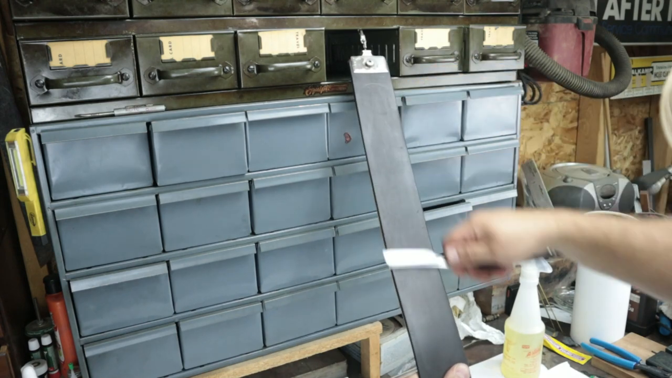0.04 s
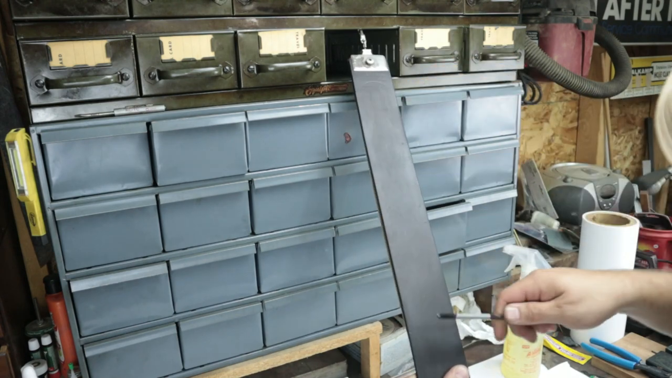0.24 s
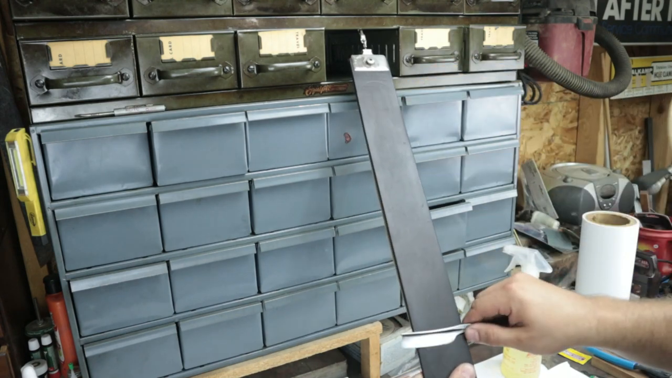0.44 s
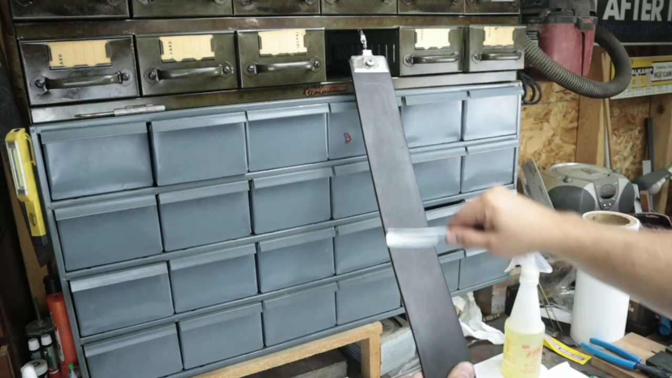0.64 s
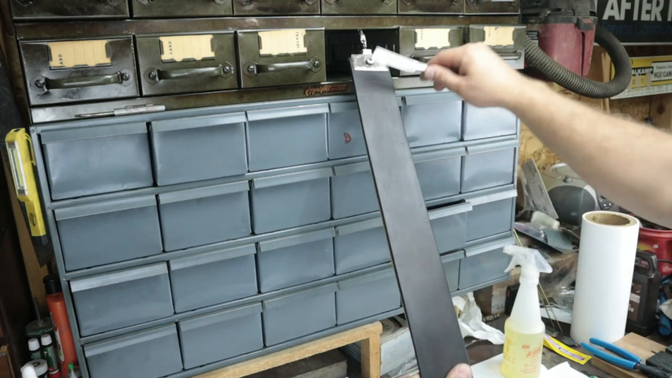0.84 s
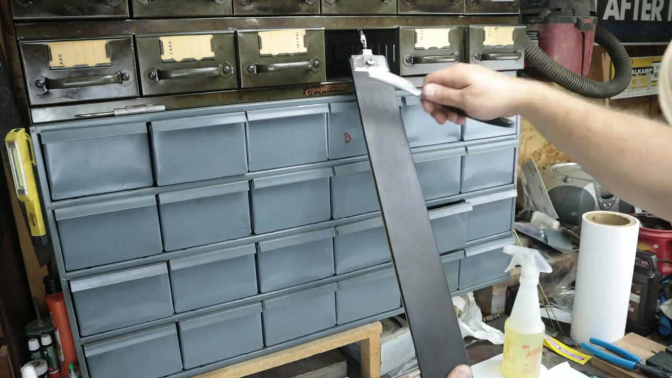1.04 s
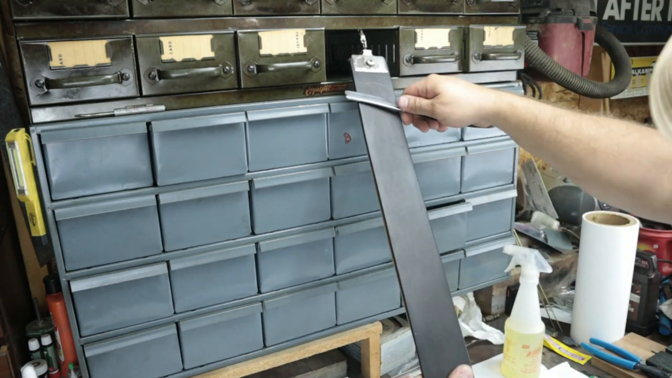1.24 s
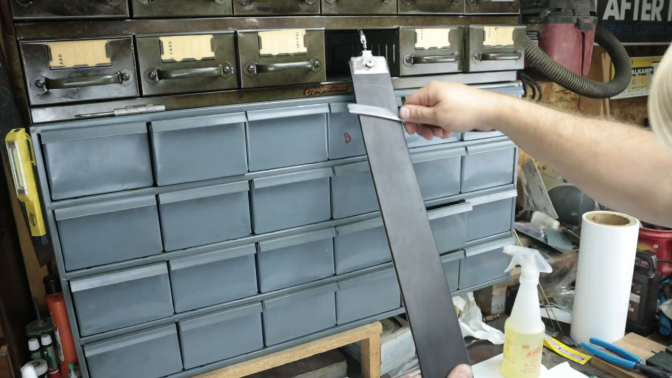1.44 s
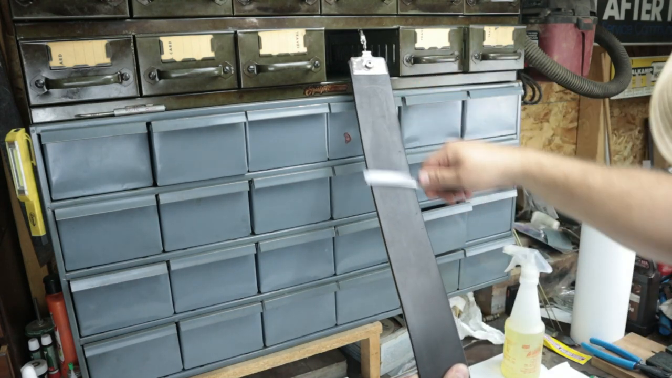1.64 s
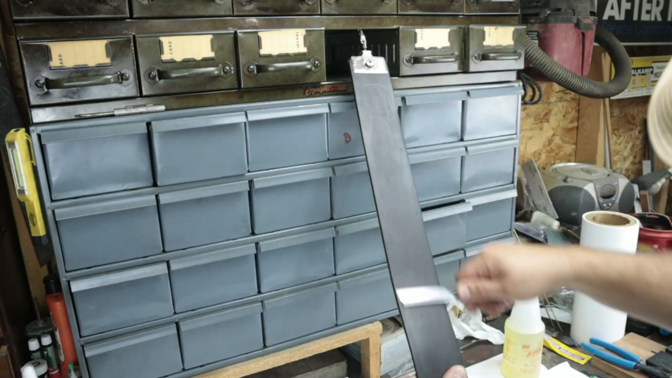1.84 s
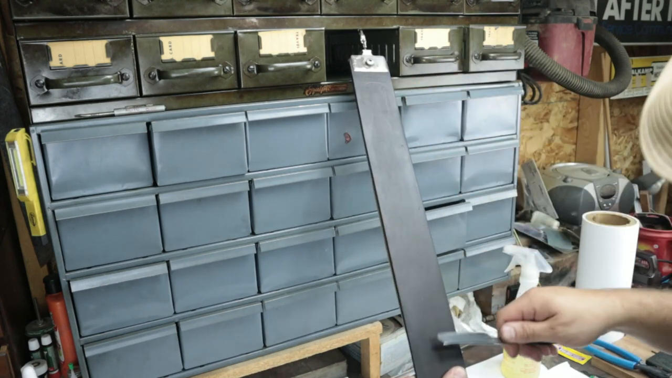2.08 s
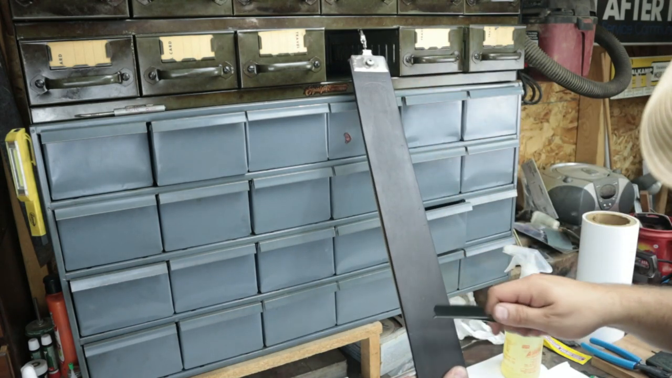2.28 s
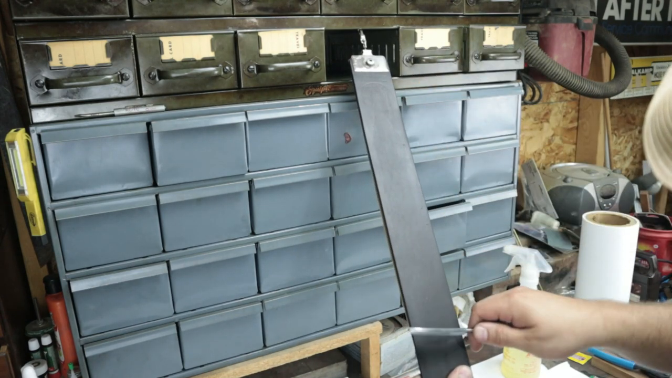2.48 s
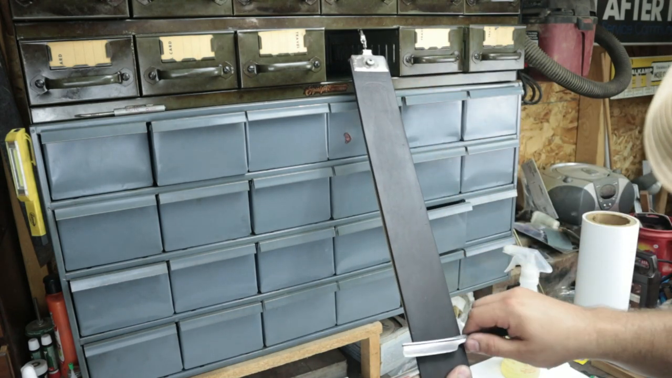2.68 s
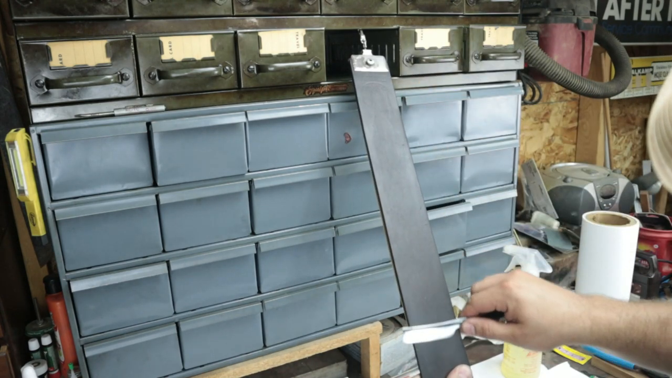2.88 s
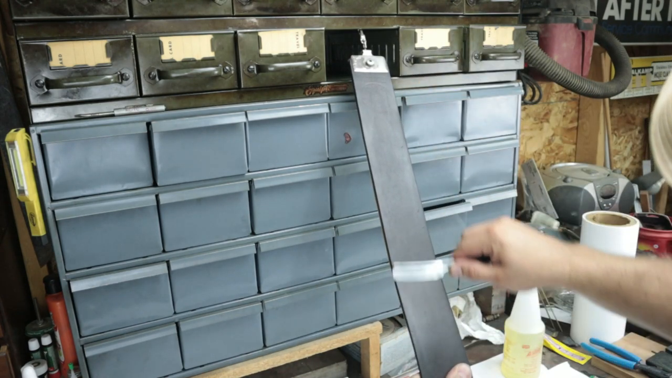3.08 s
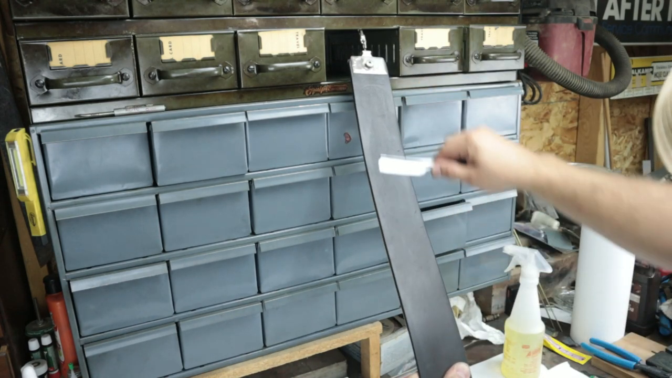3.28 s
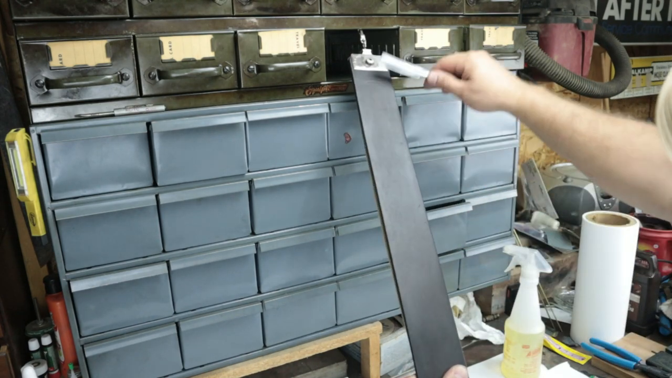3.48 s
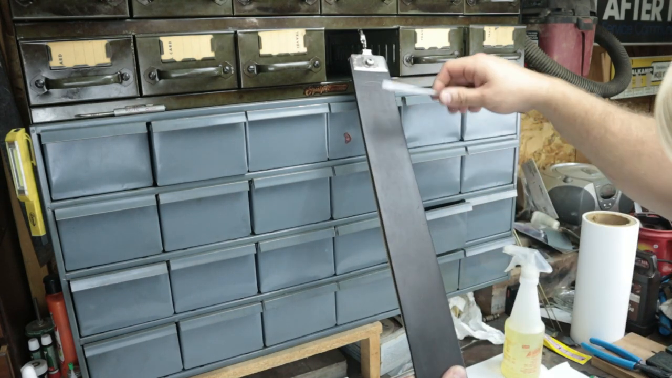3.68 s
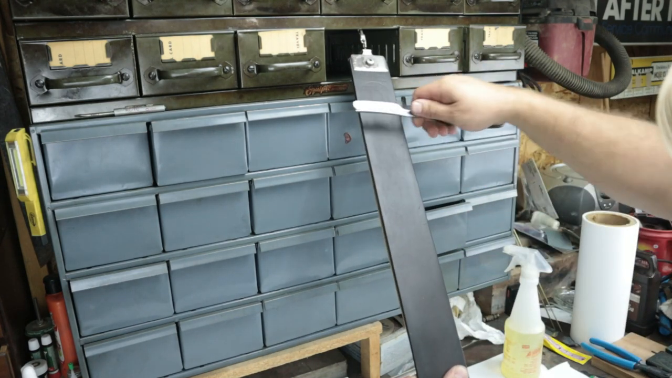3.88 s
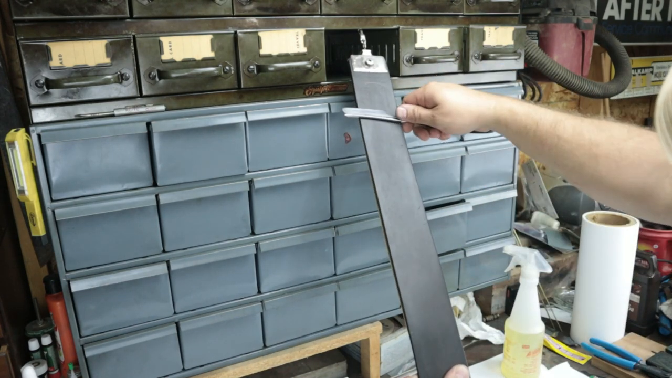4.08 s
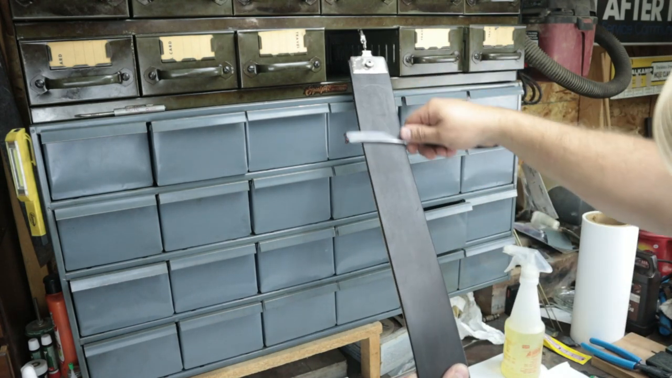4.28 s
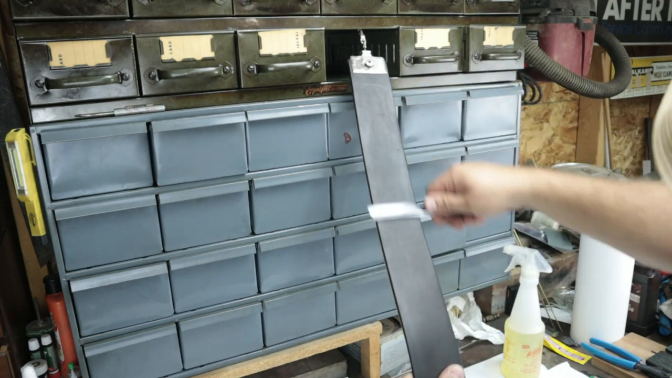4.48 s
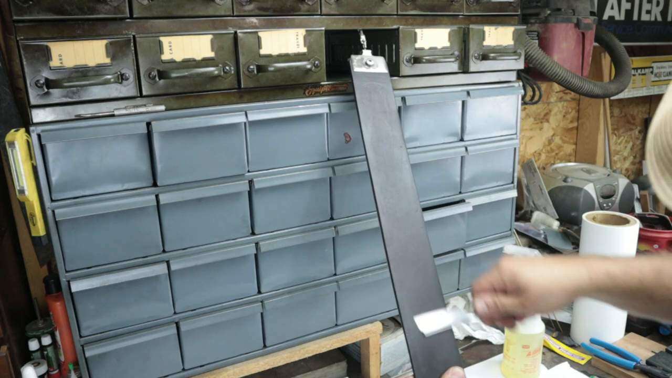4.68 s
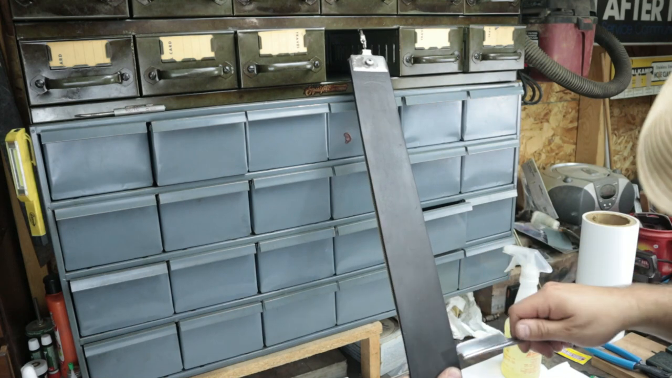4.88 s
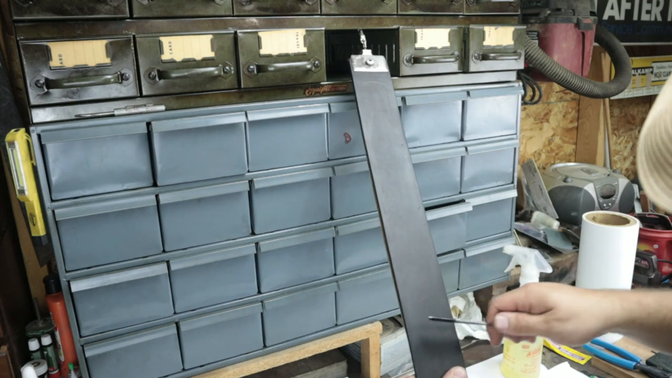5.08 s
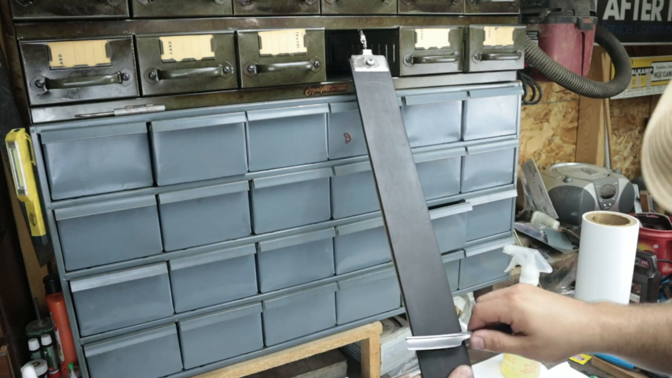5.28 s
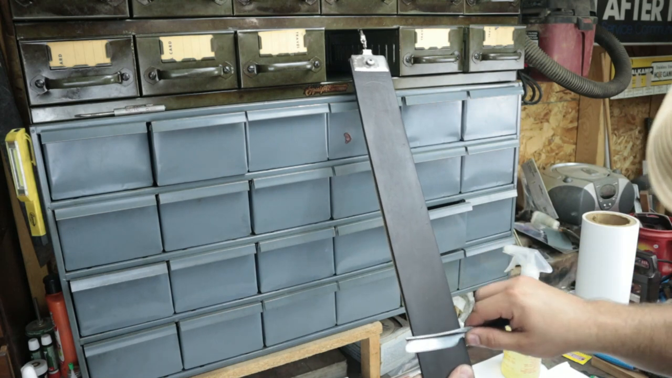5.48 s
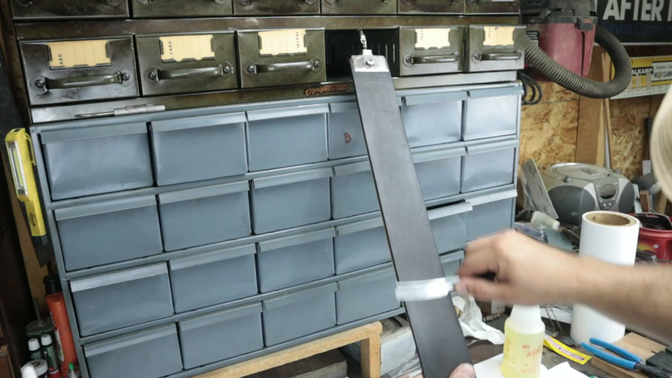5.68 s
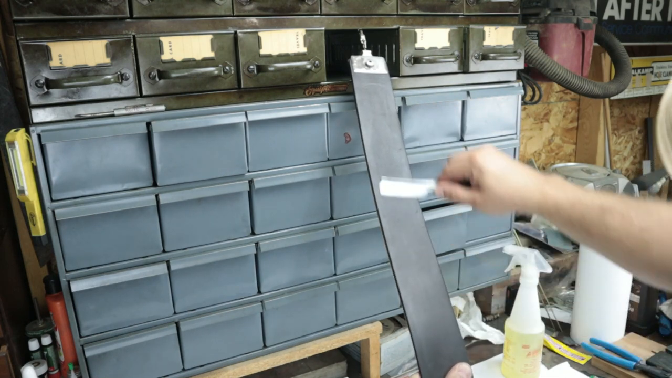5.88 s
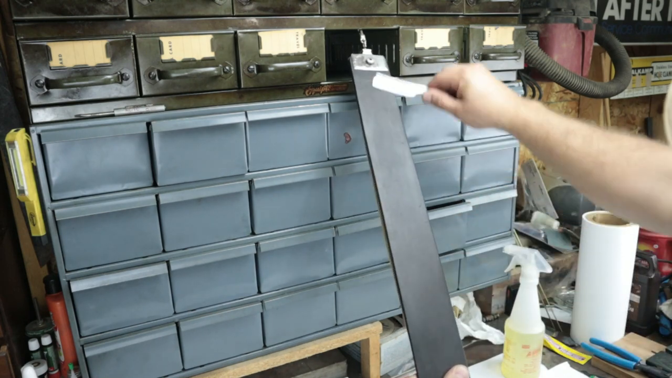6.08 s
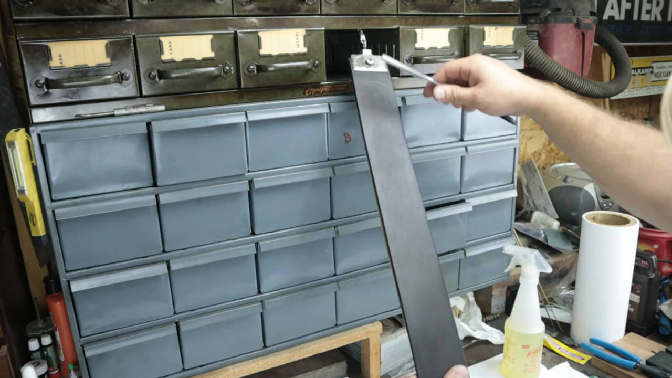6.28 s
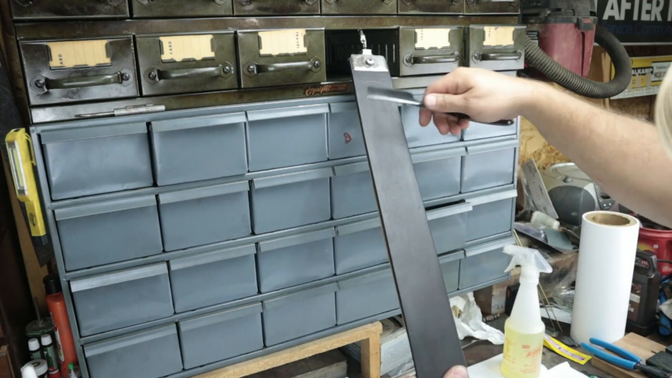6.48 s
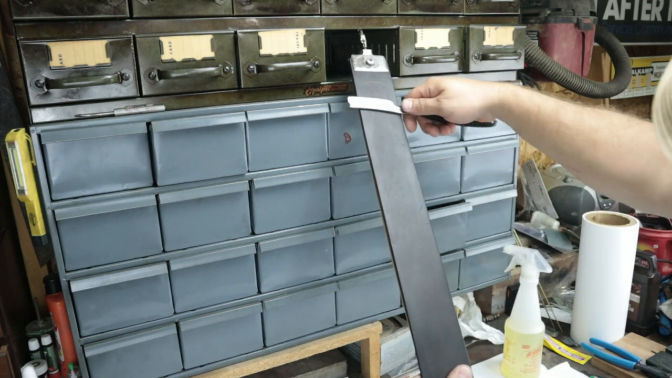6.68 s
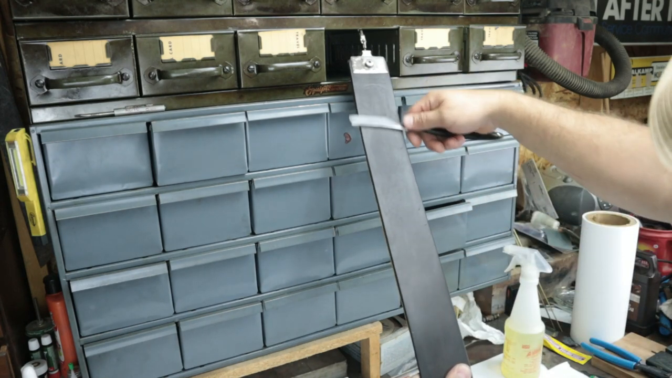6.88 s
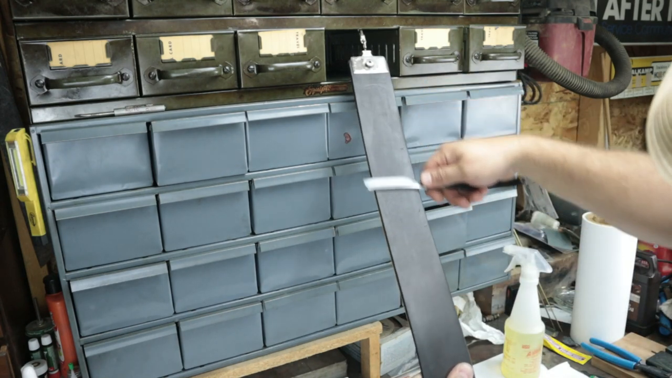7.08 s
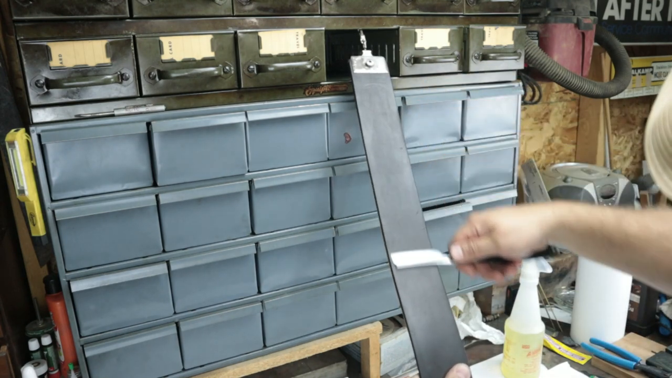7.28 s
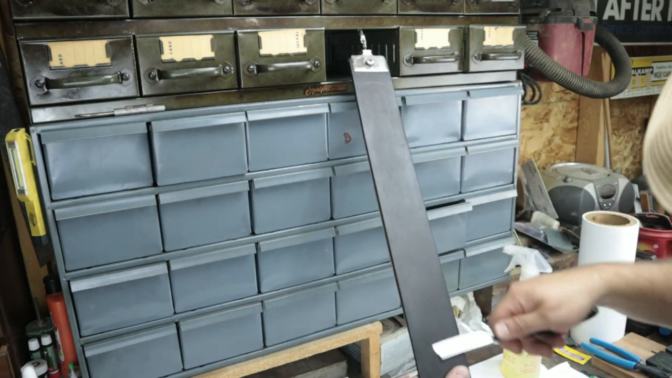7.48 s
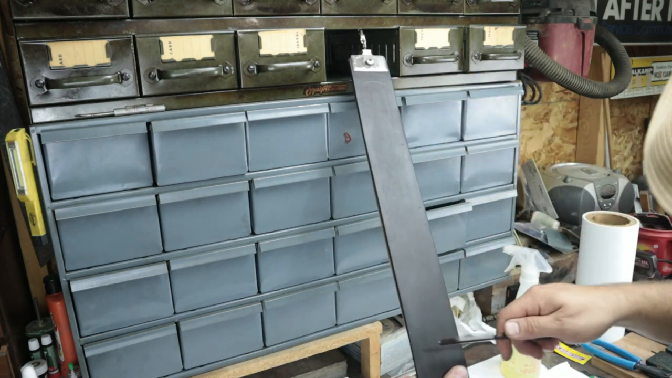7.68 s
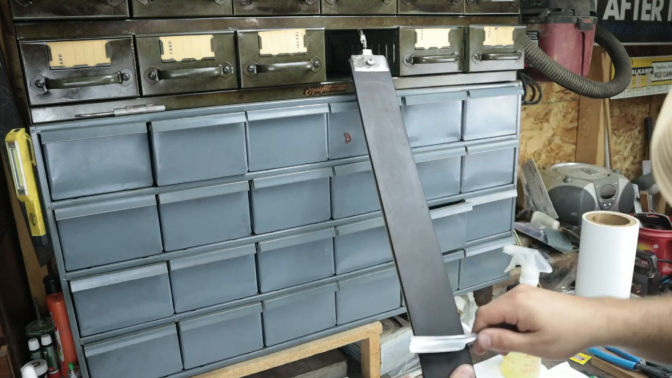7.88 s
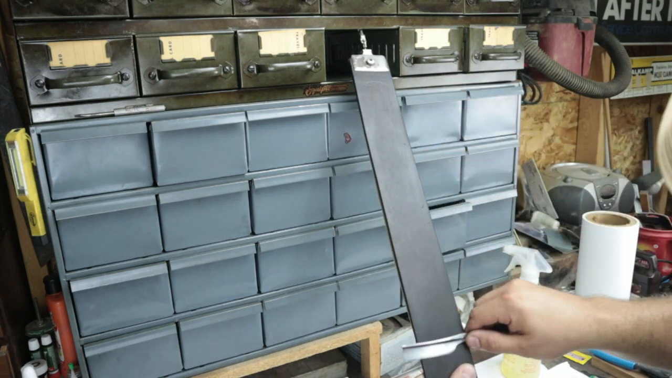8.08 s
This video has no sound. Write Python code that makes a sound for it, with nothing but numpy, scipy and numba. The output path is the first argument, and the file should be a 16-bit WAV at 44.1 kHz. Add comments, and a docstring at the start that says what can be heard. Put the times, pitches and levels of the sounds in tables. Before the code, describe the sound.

A razor on a hanging leather strop, close, in a small workshop with a very short reverberation. It opens mid-stroke with a faint grainy hiss, then a soft knock at 0.5 s and another light swish at 0.6-0.9. At 1.2 the faint wide room hum and thin, unevenly pulsing whine abruptly rise and become central. A firmer knock with a steel clink lands at 1.35. Fuller, brighter strokes follow at 1.5-2.1, 2.9-3.5, 4.3-4.9, 5.6-6.2 and 6.9-7.6, their metallic resonances sliding and flickering, with brief rasps where the edge bites, notably around 3.3-3.45 and 6.15. Knocks with short leathery thuds separate them at 2.7-2.9, 4.1-4.2, 5.4-5.5 and, strongest and nearly merged, 6.8. Faint grip rustles, low bumps and a tiny squeak at 3.8 fill pauses. A final knock falls at 8.0.

```python
"""A small, cluttered workshop, close on a straight razor stropped on a hanging leather strop, in mid-side stereo.
At once a grainy rub with gliding blade resonances; at 0.5 s the turned razor knocks on the taut leather.
Strokes and knocks alternate; at 1.2 s the faint, wide room hum and pulsing whine jump up and turn central.
From 1.9 s the edge rasps where it bites; a squeak follows at 3.8 s and a last landing at 8 s.
Clicks and noise through gliding resonances make the rub; struck filters and decaying noise make the knocks."""
import sys
import numpy as np
from scipy import signal
from scipy.fft import rfft, irfft, next_fast_len
from scipy.io import wavfile
from numba import njit

SR = 44100
rng = np.random.default_rng(int(sys.argv[2]) if len(sys.argv) > 2 else 0)


def transcribe(u):
    """Save the signal u as a 16-bit wav file named by the first command-line argument.

    u: samples, shape (n,) or (channels, n), limited to [-1, 1]; the rate is SR.
    q: integer samples, one column per channel.
    """
    v = np.clip(np.atleast_2d(u).T, -1, 1)
    q = np.round(v * 32767).astype(np.int16)
    wavfile.write(sys.argv[1], SR, q)


N = 359018
TIME = np.arange(N) / SR

# Table levels are those before the trims in the functions; a half length takes a swell's power down to 1/e.
# strokes gather speed, hold, lift off: start t/s, full speed t/s, lift t/s, leather rub level/dB,
# edge hiss level/dB, rub swell/(dB/s), hiss swell/(dB/s), low ring level/dB, high ring level/dB,
# lift-off rasp level/dB
STROKES = [(0.0, 0.057, 0.18, -49.5, -48, -2, -10, -7, -4, -60),
           (0.59, 0.694, 0.89, -53, -49.5, 2, 6, -13, -4, -55),
           (1.542, 1.738, 2.085, -43, -42, -19, -9, -5, -8, -40),
           (2.907, 3.19, 3.532, -46.5, -41.5, 7.5, 0, -10.5, -5, -39.5),
           (4.301, 4.573, 4.862, -46.5, -44, 0.5, 8, -4.5, -12, -38),
           (5.606, 5.813, 6.188, -47, -43, 6.5, 12.5, -15, -5.5, -26.5),
           (6.92, 6.98, 7.59, -56, -49, 11.5, 3.5, -8.5, -6, -58)]
# pitch of the blade's lowest ring as the contact slides along it, one curve per stroke: t/s, f/Hz
BLADE_PITCH = [
    [(0, 5800), (.2, 5500)],
    [(.6, 5800), (.9, 5300)],
    [(1.55, 5500), (1.73, 5150), (1.86, 5650), (2.1, 4900)],
    [(3.04, 4480), (3.2, 5150), (3.24, 4530), (3.42, 5450), (3.54, 5350)],
    [(4.48, 4550), (4.69, 6150), (4.74, 5150), (4.87, 5140)],
    [(5.72, 4320), (5.97, 5080), (6.18, 4600)],
    [(6.93, 4650), (7.0, 5150), (7.13, 4520), (7.34, 6070), (7.44, 4900), (7.58, 5880)],
]
# the edge bites: t/s, rasp level/dB, half length/s
BITES = [(1.918, -39.5, 0.0095), (2.894, -44.5, .003), (2.968, -52, 0.0088), (3.292, -33, 0.0027),
         (3.399, -40, .007), (3.442, -37, 0.014), (6.152, -32.5, 0.011), (7.029, -42, .003),
         (7.423, -44, 0.0025)]
# the strop shudders as a stroke brakes: t/s, level/dB, half length/s
SHUDDERS = [(.88, -48, 0.019), (3.52, -40, 0.023), (4.8, -53, 0.079), (6.12, -46, 0.036)]
# dull bumps: t/s, level/dB, half length/s
BUMPS = [(3.357, -44, 0.0091), (3.43, -50.5, 0.075), (3.77, -51.5, 0.059)]
# the hand shifts its grip between strokes: t/s, level/dB, half length/s
GRIP_SHIFTS = [(.98, -60, 0.043), (2.53, -58, 0.22), (4.22, -53.5, 0.05), (6.57, -58, 0.18)]
# a faint squeak: t/s, level/dB, half length/s
SQUEAK = [(3.83, -57.5, 0.041)]
# the razor lands: t/s, spine knock level/dB, strop thud level/dB, steel clink level/dB
LANDINGS = [(0.487, -45, -57, -74), (1.349, -35.5, -41, -34.5), (2.701, -34, -42.5, -69),
            (2.884, -38.5, -68, -55), (4.136, -28, -37.5, -51), (4.2, -41, -48, -68),
            (5.415, -24.5, -43.5, -52), (5.531, -33.5, -61, -49), (6.7732, -22, -33.5, -59),
            (6.780, -25, -36.5, -53), (8.040, -26, -43.5, -44.5)]
# the taut strop rings: f/Hz, level/dB, 60 dB decay t/s
STROP_MODES = [(184, -10.5, 0.39), (329, -3, 0.14), (679, -3, 0.054)]
# the steel rings: f/Hz, level/dB, 60 dB decay t/s
STEEL_MODES = [(5150, -12, 0.084), (5500, -28, .035), (6320, -3.5, 0.052), (6930, 2, 0.015),
               (7570, -1, 0.014), (8210, -1, 0.029), (9100, -17, 0.025), (9850, -12, 0.037),
               (10650, -15, 0.038), (12700, -16, .04)]
# spectra, each f/Hz, relative level/dB: leather rub, edge hiss, rasp of a bite
LEATHER_SPECTRUM = [(120, -5), (300, 6), (700, -4.5), (1200, 1.5), (1900, 1), (2700, 0.5), (3400, 1.5),
                    (4300, -3), (7000, 4), (15000, -20)]
EDGE_SPECTRUM = [(2000, -44), (4200, -7), (5500, -16), (7200, 2), (8700, 4), (10200, -5), (11800, 1.5),
                 (13500, -2.5), (15800, -8)]
RASP_SPECTRUM = [(1500, -32), (3800, -24), (5000, 1.5), (5700, -4), (7000, 6), (8200, -0.5), (9200, -1),
                 (12000, -9), (15800, -17)]
# strop shudder, dull bump, rustle of the grip: f/Hz, relative level/dB
SHUDDER_SPECTRUM = [(100, -8), (280, 7.5), (700, 7), (1100, 2), (1900, -31), (3500, -9.5)]
BUMP_SPECTRUM = [(25, -8), (60, 6), (120, 7.5), (220, -20), (500, -51)]
GRIP_SPECTRUM = [(150, -21), (260, 9), (380, 5), (520, -3), (1000, -28)]
# strop thud, clatter of a knock: f/Hz, relative level/dB
THUD_SPECTRUM = [(70, -24), (160, -2), (300, 2), (450, -4), (700, -10.5), (1200, -14.5), (3000, -52)]
CLATTER_SPECTRUM = [(200, 0), (600, 3.5), (1400, -1), (3000, 0.5), (4500, -14), (7000, -22), (14000, -75)]
# room tone, hiss of the side channel: f/Hz, relative level/dB
ROOM_SPECTRUM = [(13, -35), (22, 4), (27, -22), (49, -1), (124, 0.5), (159, -9.5), (269, -3.5),
                 (597, -11.5), (666, -10), (979, -13.5), (3190, -19), (6900, -21), (7700, -19.5),
                 (8370, -22), (15800, -24)]
SIDE_HISS_SPECTRUM = [(90, -34), (170, -9), (300, -4), (600, -0.5), (1500, -15.5), (5000, -9), (15800, -9)]
# hums of the room: f/Hz, width/Hz, level/dB
HUMS = [(131.9, 7.1, -65.5), (170.6, 9.3, -73.5), (300, 290, -70)]

RUB_RISE_DB, HISS_RISE_DB = 20, 13.5   # gained while the stroke gathers speed
TOUCH_DB_PER_S, LIFT_DB_PER_S = 600, 657   # the blade meets and leaves the leather
EASE_S, EASE_DB = 0.068, 6   # the rub eases just before the lift
RUB_WAVER_DB, WAVER_PER_S = 2.05, 25   # uneven pressure of the hand
HIGH_RING_RATIO, RING_WIDTH_HZ = 1.5, 230   # the second ring follows the lowest
GAP_RATIO, GAP_WIDTH_HZ, GAP_DEPTH = .82, 1020, 0.44   # the quiet gap below each ring
RING_FADE_S, RING_FLICKER_DB, RING_FLICKERS_PER_S = 0.027, 4.5, 22   # the rings come and go
SMALL_BITES_PER_S, SMALL_BITE_DB, SMALL_BITE_T60_S = 5.8, -1, 0.044   # lesser bites within the hiss
LIFT_RASP_LEAD_S, LIFT_RASP_HALF_S = 0.017, 0.0097   # the edge scrapes as it rolls off
JUMP_S, JUMP_LENGTH_S = 1.187, .015   # the background jumps up and turns central
EARLY_ROOM_DB, ROOM_DB = -61, -55   # room tone before and after the jump
EARLY_SIDE_DB = 0   # gain of the wide sound before the jump
WHINE_HZ, WHINE_WANDER_HZ = 7830, 40
CUTOFF_HZ = 15750


def strokes():
    """Leather rubs broadly; the edge hisses, bites a little and sets the blade's resonances going."""
    rub, hiss = stroke_gains()
    travel = sum(in_time([(start, -1), (lift, 1)], outside=0)[0] for start, _, lift, *_ in STROKES)
    glide = 1 + 0.09 * travel   # the resonances climb through each stroke
    body = interwoven(slips(per_s=14000, spread_db=1.2), glide, 600, 4200,
                      width_hz=150, patchy_db=2.2, wander=.03, count=14)
    steel = interwoven(slips(per_s=20000, spread_db=1.3), glide, 4600, 15200,
                       width_hz=220, patchy_db=3.2, wander=.018, count=22)
    leather_grain = from_db(-0.5) * rms_one(slips(per_s=9000, spread_db=0.3))
    leather = coloured(rms_one(body) + leather_grain, LEATHER_SPECTRUM)
    edge_grain = from_db(-2.0) * rms_one(slips(per_s=11000, spread_db=0.0))
    edge = coloured(rms_one(steel) + edge_grain, EDGE_SPECTRUM)
    bite_clicks = rng.random(N) < SMALL_BITES_PER_S / SR
    small_bites = dying(bite_clicks, t60=SMALL_BITE_T60_S) * coloured(noise(), RASP_SPECTRUM)
    blade = from_db(-2.0) * singing(edge) + from_db(SMALL_BITE_DB) * small_bites
    pressure = from_db(1.36 * drift(60))
    return pressure * (rub * leather + hiss * blade)


def stroke_gains():
    """Rub and hiss rise with the speed, swell or sag along the strop, and stop as the blade lifts."""
    rub, hiss = np.zeros((2, N))
    for start, full, lift, rub_db, hiss_db, rub_db_per_s, hiss_db_per_s, *_ in STROKES:
        slow = np.interp(TIME, [start, full], [1, 0])
        easing = np.interp(TIME, [lift - EASE_S, lift], [0, 1])
        held_s = np.clip(TIME - full, 0, lift - full)
        before_db = TOUCH_DB_PER_S * np.maximum(start - TIME, 0)
        after_db = LIFT_DB_PER_S * np.maximum(TIME - lift, 0)
        contact = from_db(-np.minimum(before_db + after_db, 120))
        rub += contact * from_db(rub_db - RUB_RISE_DB * slow + rub_db_per_s * held_s - EASE_DB * easing)
        hiss += contact * from_db(hiss_db - HISS_RISE_DB * slow + hiss_db_per_s * held_s)
    return rub * from_db(RUB_WAVER_DB * drift(WAVER_PER_S)), hiss


def interwoven(grains, glide, low_hz, high_hz, width_hz, patchy_db, wander, count):
    """Many resonances follow the contact; each wanders, swells and fades as the pressure shifts."""
    out = 0
    for k, hz in enumerate(np.linspace(low_hz, high_hz, count)):
        centre = hz * glide * (1 + wander * drift(9))
        gain = (-1) ** k * from_db(patchy_db * drift(16))   # neighbours alternate in sign
        out = out + gain * resonance(grains, centre, width_hz)
    return out


def singing(hiss):
    """Two narrow resonances come and go as they glide with the contact; each leaves a quiet gap just below it."""
    pitch, = in_time([point for curve in BLADE_PITCH for point in curve])
    pitch = pitch * (1 + .012 * drift(30))
    sounding = 0
    for curve in BLADE_PITCH:
        inside_s = np.minimum(TIME - curve[0][0], curve[-1][0] - TIME)
        sounding = sounding + np.clip(inside_s / RING_FADE_S + .5, 0, 1)
    level_rows = [(s, low_db, high_db) for start, _, lift, *_, low_db, high_db, _ in STROKES
                  for s in (start, lift)]
    out = hiss
    for hz, db in zip((pitch, HIGH_RING_RATIO * pitch), in_time(level_rows)):
        flicker_db = RING_FLICKER_DB * drift(RING_FLICKERS_PER_S)
        tone = from_db(db + flicker_db) * resonance(noise(), hz, RING_WIDTH_HZ)
        gap = glide_filter(out, GAP_RATIO * hz, float(GAP_WIDTH_HZ))
        out = out + sounding * (tone - GAP_DEPTH * gap)
    return out


def slips(per_s, spread_db):
    """Fibres catch and let go: dense clicks of uneven size."""
    return (rng.random(N) < per_s / SR) * noise() * from_db(spread_db * drift(900))


def catches():
    """The edge bites and rolls off with a bright rasp; the strop shudders, squeaks, bumps and rustles."""
    fine, coarse = slips(per_s=9000, spread_db=2.4), slips(per_s=2500, spread_db=2)
    lift_offs = [(lift - LIFT_RASP_LEAD_S, db, LIFT_RASP_HALF_S) for _, _, lift, *_, db in STROKES]
    rasp = swells(BITES + lift_offs) * coloured(fine, RASP_SPECTRUM)
    shudder = swells(SHUDDERS) * coloured(coarse, SHUDDER_SPECTRUM)
    grip = swells(GRIP_SHIFTS) * coloured(noise(), GRIP_SPECTRUM)
    squeak = swells(SQUEAK) * resonance(noise(), 1430, width_hz=40)
    bumps = swells(BUMPS) * coloured(noise(), BUMP_SPECTRUM)
    return rasp + shudder + grip + squeak + bumps


def landings():
    """A cushioned knock with a short clatter, a thud that builds in the strop, and a clink of steel."""
    hits = np.zeros((3, N))
    for s, *levels_db in LANDINGS:
        hits[:, round(s * SR)] = from_db(levels_db)
    knock, thud, clink = hits
    contact = signal.butter(1, [450, 1700], "band", fs=SR, output="sos")
    cushion = signal.butter(4, 4100, fs=SR, output="sos")
    out = from_db(21.0) * signal.sosfilt(np.vstack([contact, cushion]), knock + 1e-18)
    out += from_db(-11.0) * dying(knock, t60=0.041) * coloured(noise(), CLATTER_SPECTRUM)
    thud_swell = dying(thud, t60=0.17) - dying(thud, t60=0.011)   # builds, then decays
    out += from_db(-3.0) * thud_swell * coloured(noise(), THUD_SPECTRUM)
    out += sum(from_db(db) * ring(thud, hz, t60) for hz, db, t60 in STROP_MODES)
    return out + sum(from_db(db) * ring(clink, hz, t60) for hz, db, t60 in STEEL_MODES)


def ring(clicks, hz, t60):
    """A unit click sets a decaying sine ringing from a height of about 1."""
    r, w = from_db(-60 / (t60 * SR)), 2 * np.pi * hz / SR
    return signal.lfilter([0, np.sin(w)], [1, -2 * r * np.cos(w), r * r], clicks + 1e-18)


def workshop(x, t60=0.17):
    """Shelves and drawers scatter a short, dense tail of decaying noise."""
    t = TIME[:SR // 2]
    tail = rng.standard_normal(len(t)) * from_db(-60 * t / t60) * (t > .002)
    return signal.fftconvolve(x, tail / np.sqrt(np.sum(tail ** 2)))[:N]


def background():
    """Room tone with a few hums and a thin whine that pulses unevenly; all jump up together."""
    room = from_db(ROOM_DB) * coloured(noise(), ROOM_SPECTRUM)
    hum = sum(from_db(db) * resonance(noise(), hz, width) for hz, width, db in HUMS)
    pulsing = from_db(5 * np.sin(2 * np.pi * 17.3 * TIME + .6 * drift(3)))
    whine_hz = WHINE_HZ + WHINE_WANDER_HZ * drift(1.55)
    whine = from_db(-71.5) * pulsing * resonance(noise(), whine_hz, width_hz=51)
    return from_db(jump(EARLY_ROOM_DB - ROOM_DB, 0)) * (room + hum + whine)


def jump(before, after):
    """A setting that changes once, quickly, at the jump of the background."""
    return np.interp(TIME, [JUMP_S, JUMP_S + JUMP_LENGTH_S], [before, after])


def from_db(db):
    """Decibels to gain."""
    return 10 ** (np.asarray(db) / 20)


def rms_one(x):
    """Scale to unit power."""
    return x / np.sqrt(np.mean(x ** 2) + 1e-20)


def in_time(rows, outside=None):
    """The columns of a curve, sample by sample."""
    s, *columns = np.transpose(rows)
    return [np.interp(TIME, s, c, outside, outside) for c in columns]


def noise():
    """White noise."""
    return rng.standard_normal(N)


def drift(rate):
    """Slow chance of unit power, with this many new values per second."""
    knots = rng.standard_normal(4096)
    return rms_one(np.interp(TIME * rate, np.arange(len(knots)), knots))


def coloured(x, spectrum):
    """Shape a noise by a spectrum, straight in dB over log frequency; unit power."""
    hz, db = np.transpose(spectrum)
    size = next_fast_len(N)
    log_hz = np.log(np.maximum(np.arange(size // 2 + 1) * SR / size, 1))
    gain = from_db(np.interp(log_hz, np.log(hz), db))
    return rms_one(irfft(rfft(x, size) * gain, size)[:N])


@njit
def glide_filter(x, hz, width_hz):
    """A resonance whose centre moves: one rotating, decaying complex state."""
    out, state, pole = np.zeros(len(x)), 0j, 0j
    for i in range(len(x)):
        if i % 32 == 0:
            pole = np.exp(np.pi * (2j * hz[i] - width_hz) / SR)
        state = state * pole + x[i]
        out[i] = state.real
    return out * 2 * np.pi * width_hz / SR


def resonance(x, hz, width_hz):
    """An excitation through one resonance, steady or gliding; unit power."""
    return rms_one(glide_filter(x, hz * np.ones(N), float(width_hz)))


def dying(clicks, t60):
    """Each click starts an exponential decay."""
    return signal.lfilter([1], [1, -from_db(-60 / (t60 * SR))], clicks + 1e-18)


def swells(rows):
    """A bell-shaped swell for each event, added in power."""
    power = 0
    for s, db, half in rows:
        power = power + from_db(db) ** 2 * np.exp(-np.minimum(((TIME - s) / half) ** 2, 100))
    return np.sqrt(power)


def scene():
    """Close razor, workshop and room in the middle; unrelated scatter and room at the sides until the jump."""
    razor = strokes() + catches() + landings()
    mid = razor + from_db(-12.0) * workshop(razor) + background()
    scatter = workshop(razor, t60=0.067) + from_db(-2.5) * background()
    side_hiss = from_db(-74.5) * coloured(noise(), SIDE_HISS_SPECTRUM)
    side = jump(from_db(EARLY_SIDE_DB), 0) * scatter + side_hiss
    return np.array([mid + side, mid - side])


def record(dry):
    """Both microphone channels lose the top above a steep low-pass."""
    return signal.sosfilt(signal.ellip(12, .1, 80, CUTOFF_HZ, fs=SR, output="sos"), dry)


dry = scene()
out = record(dry)
transcribe(out)
```